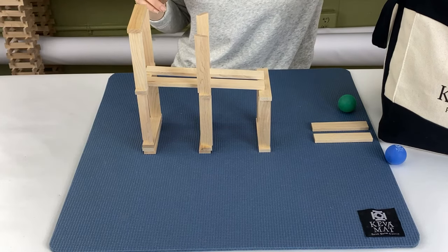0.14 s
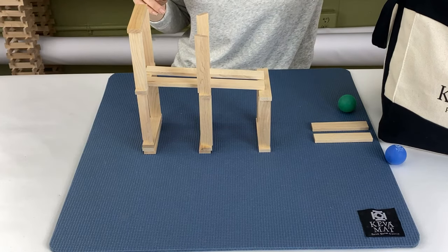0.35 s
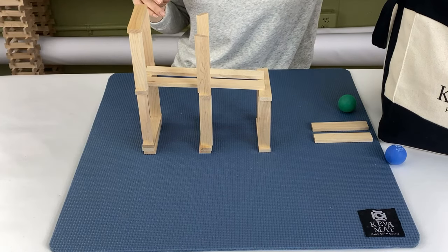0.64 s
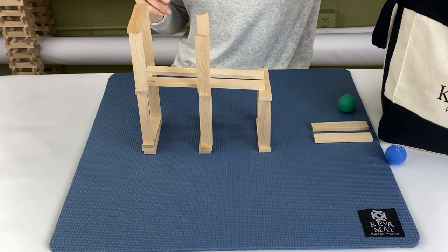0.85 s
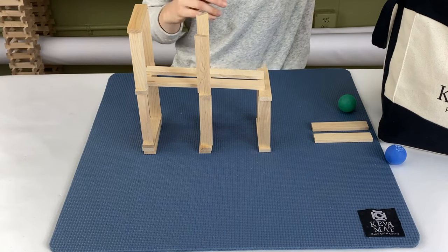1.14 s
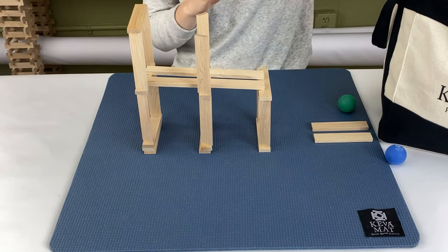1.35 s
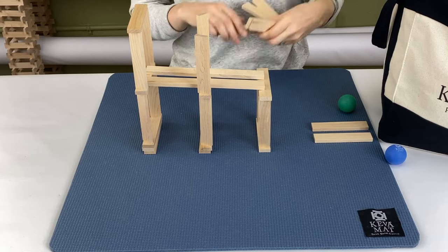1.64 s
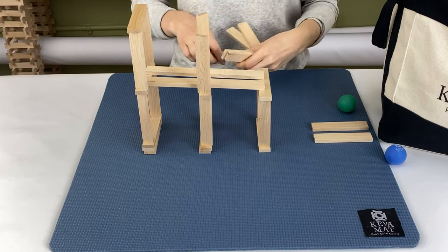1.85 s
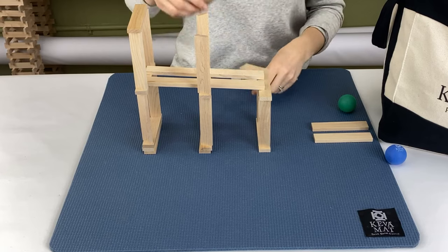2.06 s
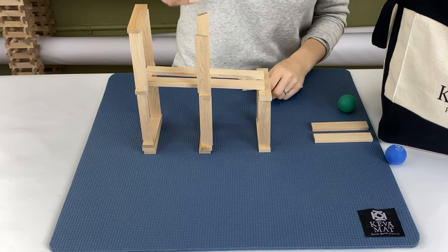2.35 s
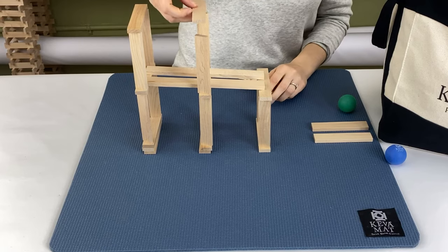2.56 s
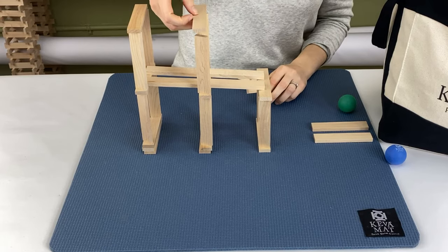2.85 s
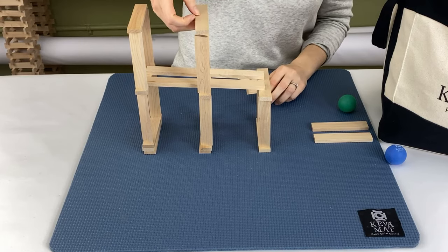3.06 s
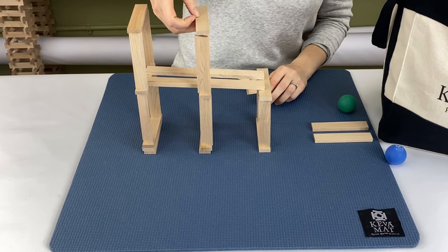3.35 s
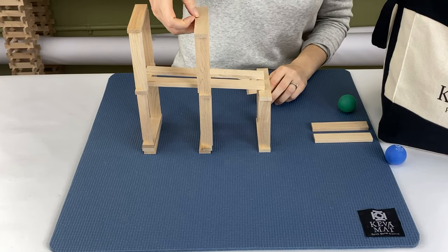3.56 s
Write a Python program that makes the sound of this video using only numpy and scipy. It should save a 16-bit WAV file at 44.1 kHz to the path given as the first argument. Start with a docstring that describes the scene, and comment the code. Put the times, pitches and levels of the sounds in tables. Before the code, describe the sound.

Small wooden planks scrape and clatter together briefly, followed by a few light taps.

```python
"""Small wooden planks are dragged out of a pile: they scrape, catch and knock together.
The scrape is many tiny slips, which also rumble in the surface below; each knock cracks and rings.
The planks are carried over with a faint rub and touch the table, and one is set on a wooden tower
with two light taps. Around them is a quiet room with humming ventilation."""
import sys
import numpy as np
from scipy import signal
from scipy.fft import rfft, irfft
from scipy.io import wavfile

SR = 44100
rng = np.random.default_rng(int(sys.argv[2]) if len(sys.argv) > 2 else 0)


def dump(signal):
    """Clip the signal to [-1, 1] and save it as 16-bit WAV at the path in sys.argv[1]."""
    limited = np.clip(np.atleast_2d(signal).T, -1, 1)
    pcm = np.round(limited * 32767).astype(np.int16)
    wavfile.write(sys.argv[1], SR, pcm)


N = 163170
T = np.arange(N) / SR

# A fade is the time to drop by 60 dB. Above a cutoff, the treble falls away.
# How loud the dragging is: time_s, rumble_db, scrape_db
SLIDE_LEVELS = [(0, -39, -55), (.03, -51.5, -75.5), (.095, -53, -64), (.125, -46, -55), (.18, -40, -38),
                (.275, -42, -53.5), (.305, -43, -57.5), (.39, -40.5, -49), (.455, -48.5, -54),
                (.49, -45.5, -43), (.545, -48, -58.5), (.61, -39.5, -50), (.67, -41, -44.5),
                (.695, -41, -51.5), (.745, -35.5, -37), (.79, -39, -46.5), (.865, -39, -49),
                (.92, -58, -91), (1.0, -55, -69), (1.15, -78.5, -100)]
# Tone of the surface below: pitch_hz, gain_db
RUMBLE_SPECTRUM = [(25, -27), (45, -4), (85, 1.5), (115, 0), (160, 3.5), (220, 2), (305, -6.5), (430, -2),
                   (525, -14), (700, -2)]
# Tone of wood scraping wood: pitch_hz, gain_db
SCRAPE_SPECTRUM = [(200, -28.5), (550, -5.5), (1000, 3.5), (1600, 4.5), (2000, 3.5), (2600, 7), (3200, 1.5),
                   (4500, -10), (6500, -8.5), (8000, -13.5), (10000, -22.5), (12500, -21.5), (16000, -40)]
# The dragged plank sticks and lets go: start_s, level_db, cutoff_hz
CATCHES = [(.111, -36, 1978), (0.1393, -34.5, 1432), (0.1502, -32.5, 2100), (0.1883, -39, 1920),
           (0.2048, -45, 2064), (0.2656, -31.5, 1920), (.322, -37.5, 2000), (0.356, -34.5, 2310),
           (0.403, -33.5, 2400), (.484, -33, 1497), (0.553, -39.5, 1906), (0.589, -43.5, 4000),
           (0.608, -43, 1800), (.668, -38, 2212), (.678, -39, 2600), (0.747, -34.5, 1918),
           (0.834, -38.5, 1683)]
# Plank hits plank, with a crack and two ringing notes: start_s, crack_db (before CRACK_TRIM_DB),
# cutoff_hz, first_hz, first_db, second_hz, second_db, fade_s, rise_s
KNOCKS = [ (0.055, -46.5, 1690, 2250, -48, 2620, -58, .07, 0.00068),
          (0.123, -41, 3000, 2410, -36, 6180, -50, .06, 0.000844),
          (0.17, -45, 4960, 2190, -31, 2755, -29.5, .05, 0.0036),
          (.187, -36.5, 3020, 2303, -30, 2640, -45, .07, 0.0022),
          (0.2291, -25.5, 4880, 2648, -21, 6160, -32, .06, 0.00061),
          (0.257, -32, 6050, 1980, -29, 5190, -30.5, 0.045, .0012),
          (0.2628, -39, 8000, 1530, -32, 9820, -36, 0.049, 0.00093),
          (0.2685, -33, 9000, 2770, -26, 5313, -28, 0.051, 0.0014),
          (.276, -42, 9000, 3962, -42, 8059, -50, .08, 0.001),
          (0.338, -39, 3000, 2495, -33.5, 2170, -38, 0.068, 0.00065),
          (0.357, -42, 3480, 2590, -40, 6160, -49, .04, 0.0011),
          (.3875, -40.5, 2488, 2460, -34.5, 2166, -35, .06, 0.0013),
          (.403, -41.5, 2510, 2150, -42, 2690, -47, .04, 0.00069),
          (0.4383, -44.5, 4014, 2440, -40, 6800, -49.5, .05, .0014),
          (0.49, -27, 4444, 2738, -27, 6120, -43, .055, 0.0013),
          (0.52, -46, 3000, 2810, -35, 6400, -50, .04, 0.0012),
          (0.5986, -35, 3950, 2480, -33, 6230, -44, .05, 0.00052),
          (0.6292, -38, 3990, 2720, -31, 6100, -52, .04, .0006),
          (0.662, -44, 4570, 2770, -40, 6200, -45.5, .04, 0.00023),
          (.7085, -43, 3440, 2570, -30.5, 3210, -38.5, 0.029, .0004),
          (0.725, -33.5, 8770, 2340, -29, 6480, -31, .05, 0.00054),
          (0.7351, -24.5, 4995, 3270, -24, 2730, -33.5, .05, 0.0027),
          (.759, -27.5, 8850, 2786, -31, 7330, -33, .07, 0.00033),
          (0.783, -38.5, 4020, 2766, -27.5, 3130, -38, .08, 0.0032),
          (0.8053, -24.5, 6000, 2725, -16, 3657, -23.5, .035, 0.00063),
          (0.8136, -25, 8970, 2840, -38, 12350, -44.5, .07, 0.000699),
          (0.831, -47.5, 5090, 2420, -28.5, 2610, -40, .07, 0.0027),
          (0.8646, -41, 2500, 2517, -30.5, 3520, -44, 0.085, 0.0011),
          (0.8705, -30.5, 4130, 2495, -21, 2780, -35, 0.037, 0.00069),
          (0.986, -50, 1300, 2480, -54, 2790, -65, .03, .0005), ]
# Tone of struck wood: pitch_hz, gain_db
CRACK_SPECTRUM = [(150, -8.5), (400, -1), (900, 1), (1900, 1.5), (3000, 2.5), (4400, 0.5), (5600, -0.5),
                  (7600, 3.5), (9000, -9.5), (10500, -8.5), (12500, -4.5), (15500, -21)]
# Hard edges meet: start_s, level_db
SNAPS = [(.1725, -67), (.2302, -58), (.2372, -41), (.2645, -43.5), (.2697, -43), (.2762, -30), (.409, -54),
         (.662, -55.5), (.7258, -40), (.7345, -39.5), (.7595, -41), (.8062, -39.5), (.8135, -39)]
# Tone of a snap: pitch_hz, gain_db
SNAP_SPECTRUM = [(2000, -34.5), (5000, -14), (7500, 4), (9500, 0), (10700, -10), (12500, -4), (14000, -13),
                 (16000, -21.5)]
# Soft bumps on the surface below: start_s, level_db, pitch_hz, fade_s
BUMPS = [(0.138, -30, 98, 0.055), (.479, -28, 136, 0.045), (0.486, -21.5, 76, 0.045),
         (0.743, -25.5, 162, .06), (.748, -27.5, 225, 0.052), (.871, -29.5, 113, 0.082),
         (2.0686, -31.5, 112, 0.058), (2.0699, -28.5, 231, 0.013)]
# Planks rub in the hand: time_s, level_db
RUB_LEVELS = [(.7, -105), (.9, -66), (1.05, -69), (1.3, -86), (1.4, -72), (1.5, -88), (1.6, -88),
              (1.78, -78), (1.89, -84), (2.05, -74), (2.17, -69.5), (2.28, -74.5), (2.36, -73), (2.47, -69),
              (2.62, -69.5), (2.67, -89), (3, -106)]
# Tone of that rubbing: pitch_hz, gain_db
RUB_SPECTRUM = [(300, 1.5), (1200, 1.5), (2700, 0), (3150, 2.5), (3800, -3), (5200, -1.5), (6200, -1),
                (7300, -1), (9000, -5.5), (12500, -2), (16000, -14.5)]
# Rubbed wood briefly sings: start_s, length_s, low_hz, low_db, high_hz, high_db
SINGS = [(1.615, 0.054, 6280, -80, 8300, -77), (1.704, 0.1, 3400, -81, 6050, -74),
         (1.784, .08, 3390, -80, 6300, -81), (2.158, 0.15, 3250, -79, 6250, -78),
         (2.297, 0.14, 3130, -72.5, 7240, -76.5), (2.441, 0.2, 3200, -94, 7220, -79),
         (2.592, 0.062, 2114, -73, 5300, -78), (2.579, 0.071, 7180, -73, 8100, -72.5)]
# A held plank meets the table or tower: start_s, push_db, push_width_s, ring_hz, ring_db, fade_s
TOUCHES = [(1.395, -52, 0.00038, 2400, -64, 0.05), (1.618, -67, .00012, 3080, -60.5, .02),
           (2.07, -40, 0.00029, 5050, -47, 0.009), (2.0711, -36.5, 0.00014, 3200, -29, 0.009),
           (2.081, -58, .0002, 3230, -57, 0.019), (2.26, -47, 0.00041, 3230, -56, 0.018),
           (2.6086, -38, 0.00018, 1400, -55, .012)]
# The plank is set on the tower: start_s, level_db, cutoff_hz
TAPS = [(3.529, -43, 3220), (3.619, -39, 7000)]
# The notes that plank rings with: pitch_hz, gain_db, fade_s
TAP_NOTES = [(134, -7.5, 0.1), (374, -11.5, 0.14), (1780, -19, 0.044), (2360, -6.5, 0.044),
             (2870, -22.5, 0.046), (4040, -13, 0.043), (6130, -15, 0.028), (6760, -24, 0.035),
             (7400, -22, .03)]
# Tone of the moving air: pitch_hz, gain_db
AIR_SPECTRUM = [(20, -22), (30, -13), (45, -1), (65, -14), (90, -18.5), (130, -18), (200, -19.5),
                (270, -21), (350, -19.5), (450, -26), (590, -31), (920, -35), (1900, -40.5), (3000, -45),
                (6000, -46.5), (14000, -46), (16000, -49)]
# Ventilation and mains hum: pitch_hz, level_db
HUM_TONES = [(39.5, -56), (44.5, -58.5), (120, -73.5), (135, -67), (180, -74), (239.6, -66), (300, -82.5),
             (363, -74)]
# How long the room rings: pitch_hz, fade_s
ROOM_FADES = [(100, 0.34), (500, 0.44), (2500, 0.18), (6000, 0.4), (14000, 0.12)]
# Echoes off the table top and nearby surfaces: delay_s
ECHO_DELAYS = [.0031, .0078, .0115, .0172]

SLIPS_PER_S, SLIP_SPREAD_DB, SLIP_FADE_S = 1100, 3, 0.013
CRACK_TRIM_DB, TICK_OVER_CRACK_DB, TICK_CUTOFF_RATIO = -2.5, 4, 1.375
KNOCK_ROUGHNESS, TOUCH_ROUGHNESS = 0.36, 0.46  # uneven ringing, as a share of the clean note
OVERTONE_RATIO, OVERTONE_DB = 2.35, -16  # a held plank's second way of bending
AIR_DB, HUM_WAVER_MAX_HZ, HUM_DRIFT_RAD = -58, 2.8, 0.6
FIRST_ECHO_DB, ROOM_RISE_S, TREBLE_LIMIT_HZ = -20, 0.0031, 15900


def sliding():
    """A dragged plank rasps on the others and rumbles in the surface below."""
    keep_lows = signal.butter(4, 520, fs=SR, output="sos")
    rumble = unit(signal.sosfilt(keep_lows, colour(slips(), RUMBLE_SPECTRUM)))
    scrape = colour(slips(), SCRAPE_SPECTRUM)
    return rumble * level(SLIDE_LEVELS, column=1) + scrape * level(SLIDE_LEVELS, column=2)


def slips():
    """Wood grips and slips at random; each tiny slip is a burst of noise of uneven size."""
    size = amp(SLIP_SPREAD_DB * np.minimum(rng.exponential(1, N), 4))
    slipping = rng.random(N) < SLIPS_PER_S / SR
    power = signal.lfilter([1], [1, -fade(1 / SR, SLIP_FADE_S) ** 2], (size * slipping) ** 2)
    return np.sqrt(power) * rng.standard_normal(N)


def catches():
    """Short dull cracks where the plank sticks and breaks free."""
    out, t = np.zeros(N), T[:SR // 10]
    for start_s, db, cutoff_hz in CATCHES:
        add(out, start_s, amp(db) * crack(t, cutoff_hz, fade_s=0.024) * rise(t, rise_s=0.0005))
    return out


def knocks():
    """Each hit ticks, cracks and rings two notes, roughened by chatter against loose planks."""
    out, t = np.zeros(N), T[:SR // 5]
    for start_s, crack_db, cutoff_hz, first_hz, first_db, second_hz, second_db, fade_s, rise_s in KNOCKS:
        body = crack(t, cutoff_hz, fade_s=0.036)
        tick = amp(TICK_OVER_CRACK_DB) * crack(t, cutoff_hz * TICK_CUTOFF_RATIO, fade_s=0.011)
        hit = amp(crack_db + CRACK_TRIM_DB) * (body + tick)
        for hz, db in (first_hz, first_db), (second_hz, second_db):
            chatter = amp(db) * fade(t, fade_s) * rough_tone(t, hz, width_hz=370)
            hit += note(t, hz, db, fade_s) + KNOCK_ROUGHNESS * chatter
        add(out, start_s, hit * rise(t, rise_s))
    return out


def snaps():
    """Hard edges meet in a very short, bright burst."""
    out, t = np.zeros(N), T[:SR // 10]
    for start_s, db in SNAPS:
        burst = colour(rng.standard_normal(len(t)), SNAP_SPECTRUM)
        add(out, start_s, amp(db) * burst * fade(t, fade_s=0.01))
    return out


def bumps():
    """The surface below gives low thuds with a soft start."""
    out, t = np.zeros(N), T[:SR // 5]
    for start_s, db, hz, fade_s in BUMPS:
        add(out, start_s, -note(t, hz, db, fade_s) * rise(t, rise_s=0.0021))
    return out


def touches():
    """A held plank lands with a short push, a dull crack and a ring that the hand chokes."""
    out, t = np.zeros(N), T[:SR // 5]
    for start_s, push_db, width_s, hz, ring_db, fade_s in TOUCHES:
        overtone = note(t, hz * OVERTONE_RATIO, ring_db + OVERTONE_DB, fade_s)
        chatter = amp(ring_db) * fade(t, fade_s) * rough_tone(t, hz, width_hz=310)
        ring = note(t, hz, ring_db, fade_s) + overtone + TOUCH_ROUGHNESS * chatter
        body = amp(-13.5) * crack(t, cutoff_hz=2000, fade_s=0.025)
        push = -np.exp(-(t / width_s - 2) ** 2)
        add(out, start_s, amp(push_db) * (body + push) + ring * rise(t, rise_s=0.0014))
    return out


def taps():
    """One plank ticks lightly against the tower and rings."""
    out, t = np.zeros(N), T[:SR // 5]
    for start_s, db, cutoff_hz in TAPS:
        ring = sum(note(t, hz, gain_db, fade_s) / np.sqrt(1 + (hz / cutoff_hz) ** 6)
                   for hz, gain_db, fade_s in TAP_NOTES)
        body = amp(-15) * crack(t, cutoff_hz=2100, fade_s=0.074)
        tick = amp(-10) * crack(t, cutoff_hz=2100, fade_s=0.0047)
        add(out, start_s, amp(db) * (ring + body + tick))
    return out


def rubbing():
    """Planks hiss softly in the hand and now and then swell into two rough notes."""
    out, t = colour(rng.standard_normal(N), RUB_SPECTRUM) * level(RUB_LEVELS), T[:SR // 4]
    for start_s, length_s, low_hz, low_db, high_hz, high_db in SINGS:
        low = amp(low_db) * rough_tone(t, low_hz, width_hz=410)
        high = amp(high_db) * rough_tone(t, high_hz, width_hz=410)
        swell = np.sin(np.pi * np.minimum(t / length_s, 1))
        add(out, start_s, (low + high) * swell)
    return out


def crack(t, cutoff_hz, fade_s):
    """Struck wood rings briefly at many pitches at once; a softer hit has a lower cutoff."""
    hz = np.fft.rfftfreq(len(t), 1 / SR)
    phases = np.exp(2j * np.pi * rng.random(len(hz)))
    strength = amp(look_up(CRACK_SPECTRUM, hz)) / np.sqrt(1 + (hz / cutoff_hz) ** 5.1)
    return unit(irfft(phases * strength, len(t))) * fade(t, fade_s)


def note(t, hz, db, fade_s):
    """One pure vibration dying away."""
    return amp(db) * fade(t, fade_s) * np.sin(2 * np.pi * hz * t)


def rough_tone(t, hz, width_hz):
    """Uneven contact keeps a note going and smears it over nearby pitches."""
    offset_hz = np.fft.fftfreq(len(t), 1 / SR)
    wobble = np.fft.ifft(np.exp(2j * np.pi * rng.random(len(t)) - np.log(4) * (offset_hz / width_hz) ** 2))
    wobble /= np.sqrt(np.mean(abs(wobble) ** 2))
    return np.sqrt(2) * (wobble * np.exp(2j * np.pi * hz * t)).real


def ventilation():
    """A steady rush of air with slowly wavering hum tones."""
    out = amp(AIR_DB) * colour(rng.standard_normal(N), AIR_SPECTRUM)
    for hz, db in HUM_TONES:
        drift = sum(np.sin(2 * np.pi * (HUM_WAVER_MAX_HZ * speed * T + offset))
                    for speed, offset in rng.random((4, 2)))
        phase = 2 * np.pi * (hz * T + rng.random()) + HUM_DRIFT_RAD * drift
        out += amp(db) * np.sqrt(2) * np.sin(phase)
    return out


def room(sound, tail_db):
    """Nearby surfaces add a few echoes, and the room adds a short wash of sound."""
    hz, t, noise = signal.stft(rng.standard_normal(SR // 2), SR, nperseg=256)
    tail = signal.istft(noise * fade(t, look_up(ROOM_FADES, hz)[:, None]), SR, nperseg=256)[1]
    tail *= np.minimum(T[:len(tail)] / ROOM_RISE_S, 1) ** 2
    tail *= amp(tail_db) / np.linalg.norm(tail)
    for k, delay_s in enumerate(ECHO_DELAYS):
        tail[round(delay_s * SR)] += amp(FIRST_ECHO_DB) / np.sqrt(k + 1)
    return sound + signal.fftconvolve(sound, tail)[:N]


def amp(db):
    """Turns decibels into a multiplier."""
    return 10 ** (np.asarray(db) / 20)


def unit(sound):
    """Scales a sound to an average strength (rms) of 1."""
    return sound / np.sqrt(np.mean(sound ** 2) + 1e-20)


def fade(t, fade_s):
    """Falls from 1, by 60 dB every fade_s."""
    return np.exp(-np.log(1000) * t / fade_s)


def rise(t, rise_s):
    """Climbs from 0 towards 1 to soften a start."""
    return 1 - np.exp(-t / rise_s)


def look_up(table, hz):
    """Reads a table's value at any pitch, blending between rows."""
    pitches, values = np.transpose(table)
    return np.interp(np.log(hz + 1), np.log(pitches + 1), values)


def level(table, column=1):
    """Turns a column of decibels into a multiplier over time."""
    rows = np.array(table)
    return amp(np.interp(T, rows[:, 0], rows[:, column]))


def colour(sound, spectrum):
    """Shapes a sound's lows and highs, then scales it to strength 1."""
    gain = amp(look_up(spectrum, np.fft.rfftfreq(len(sound), 1 / SR)))
    return unit(irfft(rfft(sound) * gain, len(sound)))


def add(mix, start_s, sound):
    """Mixes a sound in at its start time."""
    part = mix[max(round(start_s * SR), 0):][:len(sound)]
    part += sound[:len(part)]


def scene():
    """The pile is further off than the tower, so it has more room sound; ventilation lies under both."""
    pile = room(knocks() + catches() + snaps() + bumps() + sliding(), tail_db=-10)
    tower = room(taps() + touches() + rubbing(), tail_db=-12.5)
    return (pile + tower + ventilation())[None]


def record(dry):
    """Cuts away the very highest treble."""
    treble_cut = signal.firwin(511, TREBLE_LIMIT_HZ, window=("kaiser", 9), fs=SR)
    return signal.oaconvolve(dry, treble_cut[None], "same")


dry = scene()
out = record(dry)
dump(out)
```